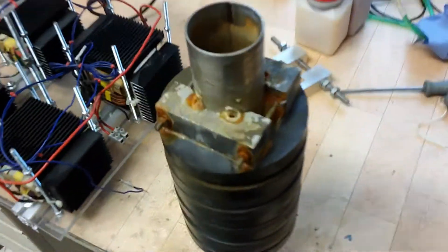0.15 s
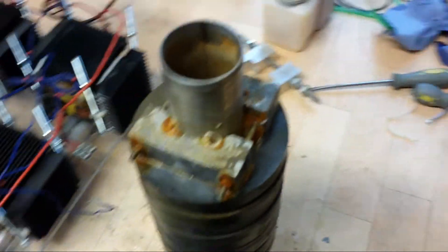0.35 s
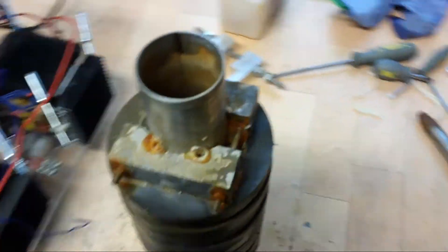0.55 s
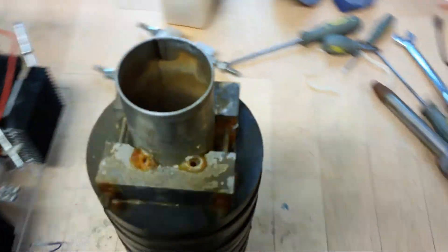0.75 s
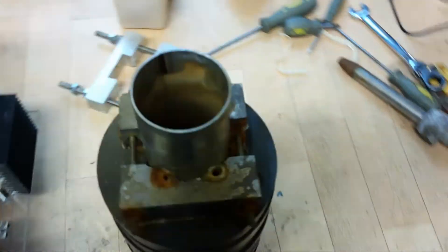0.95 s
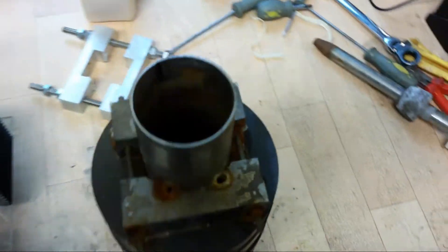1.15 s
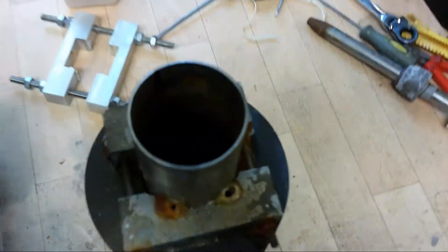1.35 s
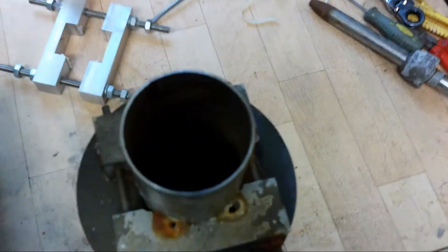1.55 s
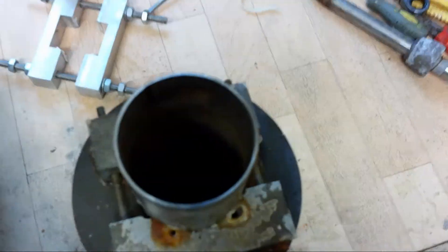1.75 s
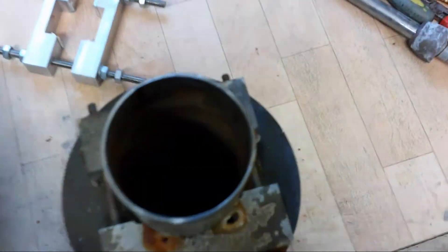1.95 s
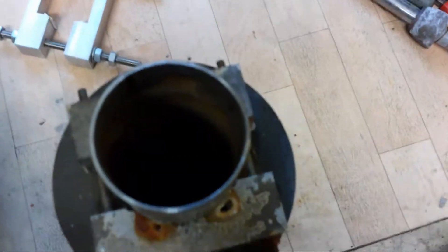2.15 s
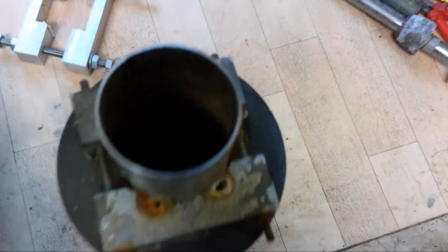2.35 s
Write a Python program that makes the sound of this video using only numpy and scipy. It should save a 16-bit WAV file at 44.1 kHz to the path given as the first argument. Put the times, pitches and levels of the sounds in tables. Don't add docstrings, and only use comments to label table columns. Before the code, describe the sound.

A heavy hollow metal part knocks twice on a wooden bench with short clanky rings and tiny bounces, then drags in quiet uneven rubs; faint hand rustle, low room hum, close dull-topped microphone.

```python
import sys
import numpy as np
from scipy import signal
from scipy.fft import rfft, irfft, next_fast_len
from scipy.io import wavfile
from scipy.ndimage import map_coordinates

SR = 44100
rng = np.random.default_rng(int(sys.argv[2]) if len(sys.argv) > 2 else 0)


def wrap_up_sound(samples):
    columns = np.atleast_2d(samples).T
    tamed = np.clip(columns, -1, 1)
    steps = np.round(tamed * 32767).astype(np.int16)
    wavfile.write(sys.argv[1], SR, steps)


def voltage_ratio(level):
    return 10 ** (np.asarray(level, float) / 20)


N = 105840

# freq_hz, density_db [dB per Hz]
AIR_COLOUR = [(15, -19), (25, -9.5), (172, -3), (600, -14), (955, -14.5), (2300, -19), (5420, -30.5),
              (6270, -26), (8620, -37), (11200, -68.5), (19000, -120)]
# peak_s, rise_s, fall_s, peak_db, centre_hz
RUSTLES = [(0.002, 0.014, 0.049, -52, 800), (.006, 0.04, 0.06, -56, 6000), (0.011, 0.067, 0.044, -48, 2200),
           (.19, 0.072, 0.085, -60.5, 6000), (.2, 0.11, 0.024, -53, 1800), (.48, 0.046, 0.043, -65, 6800),
           (.635, 0.032, 0.14, -49.5, 1300), (.64, 0.035, 0.15, -56.5, 6000),
           (0.656, 0.046, .05, -50.5, 2800), (.77, 0.043, 0.07, -45.5, 700),
           (0.839, 0.079, 0.17, -61.5, 2315), (.85, 0.041, 0.062, -51.5, 3900), (.93, 0.12, 0.15, -57, 900),
           (1.23, 0.18, 0.15, -63.5, 6000), (1.25, .06, 0.093, -55.5, 3000),
           (1.271, 0.066, 0.054, -49.5, 850), (1.646, 0.051, 0.059, -53, 1500),
           (1.65, .04, 0.03, -60.5, 3400), (2.1, 0.072, 0.033, -61.5, 2160)]
# pitch_hz, level_db, t60_s
BODY_MODES = [(163.2, -13.5, 0.18), (352.2, -0.5, 0.082), (409.1, 0, 0.07), (444.9, -13, 0.36),
              (677.5, -2.5, 0.054), (788, -16, 0.037), (1037.4, -3.5, 0.11), (1500, -13.5, 0.091),
              (1060, -19, 0.14)]
# pitch_hz, level_db, t60_s
WALL_MODES = [(1706, -11.5, 0.012), (2295, -4.5, 0.041), (2520, -4.5, 0.055), (2684, 1, 0.025),
              (2931, -4, 0.023), (3205, -4.5, 0.031), (3550, -6.5, 0.025), (4112, -9, 0.047),
              (4420, -15, .025), (4610, -12, 0.022), (5450, -4, 0.028), (6120, -12.5, 0.014),
              (6453, -14.5, .02)]
# start_s, peak_db, body_over_wall_db, upper_body_db, hardness_db [dB per octave]
KNOCKS = [(0.2117, -14.5, -2.5, 0.8, -3), (0.2586, -36.5, -4.5, 1, -5), (0.2846, -39.5, 0.5, -5.5, -5),
          (0.3379, -43, -5.5, -2, -6), (.675, -14.5, -6.5, -0.3, 1), (0.7144, -22, -5.5, -3, 0),
          (0.7398, -37.5, -3.5, -4, -6), (0.763, -44.5, -1, -3, -7), (0.7663, -40, 1.5, -1, -8),
          (0.785, -41.5, -3, 3.5, -5), (0.8044, -43, -11, 3.5, -1.5)]
# freq_hz, density_db [dB per Hz]
CRACK_COLOUR = [(300, -18), (1200, -5.5), (2000, 0.5), (2800, 0.5), (4300, -2.5), (5000, -10.5),
                (5600, -6.5), (7000, -18.5), (9000, -37)]
# freq_hz, t60_s
ROOM_DECAY = [(200, 0.26), (1000, 0.32), (3000, 0.21), (5000, 0.24), (8000, 0.065)]
# time_s, pressure_db, scrape_db
DRAG = [(.74, -97, -68), (.8, -58, -54.5), (1.0, -57.5, -62.5), (1.03, -79.5, -64), (1.045, -46, -73),
        (1.12, -56, -59), (1.17, -47.5, -60), (1.212, -39.5, -49), (1.31, -43.5, -50.5),
        (1.348, -59.5, -58), (1.386, -44, -64), (1.43, -67, -66), (1.46, -65, -77), (1.52, -62, -86),
        (1.6, -79, -64)]
# time_s, pressure_db, scrape_db
NUDGE = [
    (1.97, -67, -76),
    (2.02, -56, -78),
    (2.08, -47, -58),
    (2.119, -46.5, -56),
    (2.148, -70, -70),
    (2.179, -47, -66),
    (2.23, -95, -79),
]
# start_s, wall_db, body_db
CATCHES = [(1.04, -53.5, -39), (1.064, -44.5, -40), (1.098, -59, -38), (1.114, -51, -39.5),
           (1.187, -47, -33.5), (1.209, -40, -28), (1.226, -42, -35), (1.249, -36.5, -28.5),
           (1.267, -38.5, -39), (1.276, -51, -47), (1.291, -37, -36), (1.318, -44, -53),
           (1.374, -43.5, -33.5), (1.42, -67, -39), (2.017, -70, -40), (2.034, -58, -42.5),
           (2.055, -53.5, -39), (2.1, -51, -33.5), (2.119, -65, -34), (2.16, -48.5, -39)]
PRESSED_DB = [-7, -0.5, 1.5, -9, -10.5, 0.5, -20.5, -1, -5.5]
SCRAPED_DB = [11, -13.5, -5.5, -1.5, 2, -3, 1.5, -6, -2.5, -3.5, -9.5, 1, -1]


def unit(x):
    return x / np.sqrt(np.mean(x ** 2) + 1e-20)


def along(points, hz):
    f, value = np.transpose(points)
    return np.interp(np.log(hz + 1), np.log(f + 1), value)


def wobble(rate_hz):
    knots = rng.standard_normal(int(N * rate_hz / SR) + 4)
    return map_coordinates(knots, [np.arange(N) * rate_hz / SR])


def filtered(x, response):
    size = next_fast_len(x.shape[-1] + 8192)
    spectrum = rfft(x, size) * response(np.fft.rfftfreq(size, 1 / SR))
    return irfft(spectrum, size)[..., :x.shape[-1]]


def noise(response, size=N):
    return unit(filtered(rng.standard_normal(size), response))


def air():
    bass = noise(lambda f: voltage_ratio(along(AIR_COLOUR, f)) * (f < 300))
    hiss = noise(lambda f: voltage_ratio(along(AIR_COLOUR, f)) * (f >= 300))
    bass = voltage_ratio(1.15 * wobble(12.5)) * bass
    hiss = voltage_ratio(0.2 * wobble(20)) * hiss
    return voltage_ratio(-55) * (voltage_ratio(-2.5) * bass + voltage_ratio(-2.0) * hiss)


def rustle():
    grain_db, width_octaves = 2.5, 0.48
    t = np.arange(N) / SR
    out = np.zeros(N)
    for peak_s, rise_s, fall_s, peak_db, centre_hz in RUSTLES:
        rise = np.clip(1 + (t - peak_s) / rise_s, 0, 1)
        fall = np.exp(-np.maximum(t - peak_s, 0) / fall_s)

        def hump(f):
            octaves = np.log2(f / centre_hz + 1e-9)
            return np.exp(-(octaves / width_octaves) ** 2 / 2) / np.sqrt(f + 100)

        out += voltage_ratio(peak_db + grain_db * wobble(150)) * rise * fall * noise(hump)
    return out


def ring(modes, change_db, t60_scale=1):
    t = np.arange(SR // 3) / SR
    out = np.zeros(len(t))
    for k, ((pitch_hz, level_db, t60_s), change) in enumerate(zip(modes, change_db)):
        decay = voltage_ratio(level_db + change - 60 * t / (t60_s * t60_scale))
        out += (-1) ** k * decay * np.sin(2 * np.pi * pitch_hz * t)
    return out


def knocks():
    wall_gain_db, body_gain_db, crack_gain_db = -12.5, -0.5, -6
    crack_t60_s, chatter_t60_s = 0.018, 0.041
    contact_s, body_rise_s = 0.0007, 0.0013
    t = np.arange(SR // 3) / SR
    out = np.zeros(N + SR)
    is_upper = np.transpose(BODY_MODES)[0] > 600
    wall_octaves = np.log2(np.transpose(WALL_MODES)[0] / 2700).clip(0)
    for start_s, peak_db, body_db, upper_db, hardness_db in KNOCKS:
        chatter = 0.035 * voltage_ratio(-60 * t[:2000] / chatter_t60_s) * rng.standard_normal(2000)
        chatter[0] += 1
        scatter_db = 3.8 * rng.standard_normal(len(WALL_MODES))
        wall = ring(WALL_MODES, hardness_db * wall_octaves + scatter_db)
        wall = signal.fftconvolve(wall, chatter / np.linalg.norm(chatter))[:len(t)]

        def crack_colour(f):
            return voltage_ratio(along(CRACK_COLOUR, f) + hardness_db * np.log2(np.maximum(f / 2700, 1)))

        crack = voltage_ratio(crack_gain_db - 60 * t / crack_t60_s) * noise(crack_colour, len(t))
        body = ring(BODY_MODES, upper_db * is_upper + rng.standard_normal(len(BODY_MODES)))
        body *= voltage_ratio(body_gain_db + body_db) * (1 - np.exp(-t / body_rise_s))
        first = round((start_s + contact_s) * SR)
        out[first:first + len(t)] += voltage_ratio(peak_db) * (voltage_ratio(wall_gain_db) * wall + crack + body)
    return out[:N]


def room(x):
    hz, t, z = signal.stft(rng.standard_normal(SR // 2), SR, nperseg=256)
    decay = voltage_ratio(-60 * t / along(ROOM_DECAY, hz)[:, None])
    tail = signal.istft(z * decay, SR, nperseg=256)[1]
    delayed = np.pad(x, (300, 0))
    return signal.fftconvolve(delayed, tail / np.linalg.norm(tail))[:N]


def drag():
    slips_per_s, slip_spread_db = 2300, 3.5
    catch_detune, catch_scatter_db, catch_rise_s = 0.03, 2.5, 0.006
    time_s, *levels = np.transpose(DRAG + NUDGE)
    body = ring(BODY_MODES, PRESSED_DB, t60_scale=0.96)
    wall = ring(WALL_MODES, SCRAPED_DB, t60_scale=0.69)

    happens = rng.random((2, N)) < slips_per_s / SR
    strength = voltage_ratio(slip_spread_db * rng.standard_normal((2, N)))
    slips = unit(happens * strength * rng.choice([-1, 1], (2, N)))
    out = np.zeros(N + SR)
    for slip, level, answer in zip(slips, levels, (body, wall)):
        force = slip * voltage_ratio(np.interp(np.arange(N) / SR, time_s, level, left=-120))
        out[:N] += signal.fftconvolve(force, answer / np.linalg.norm(answer))[:N]

    thud = body * (1 - np.exp(-np.arange(len(body)) / SR / catch_rise_s))
    for start_s, wall_db, body_db in CATCHES:
        shifted = np.array(WALL_MODES)
        shifted[:, 0] *= 1 + catch_detune * rng.standard_normal(len(shifted))
        tick = ring(shifted, SCRAPED_DB + catch_scatter_db * rng.standard_normal(len(shifted)))
        first = round(start_s * SR)
        out[first:first + len(tick)] += voltage_ratio(wall_db) * tick + voltage_ratio(body_db) * thud
    return out[:N]


def snap():
    start_s, level_db, pitch_hz, t60_s, rise_s = 0.8364, -32, 5930, 0.0074, 0.00029
    t = np.maximum(np.arange(N) / SR - start_s, 0)
    envelope = voltage_ratio(level_db - 60 * t / t60_s) * (1 - np.exp(-t / rise_s))
    return envelope * np.sin(2 * np.pi * pitch_hz * t) * (1 + 1.2 * wobble(3135))


def scene():
    part = knocks() + drag() + snap()
    return (part + voltage_ratio(-17.5) * room(part) + rustle() + air())[None]


def roll_off(x):
    return signal.sosfilt(signal.butter(12, 8770, fs=SR, output="sos"), x)


def record(dry):
    top_hz, hiss_db = 8080, -81
    limited = filtered(dry, lambda f: 1 / (1 + (f / top_hz) ** 30))
    mix = limited + voltage_ratio(hiss_db) * rng.standard_normal(dry.shape)
    return roll_off(mix)


dry = scene()
out = record(dry)
wrap_up_sound(out)
```